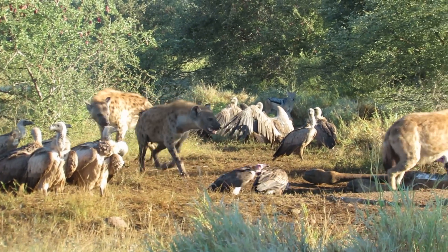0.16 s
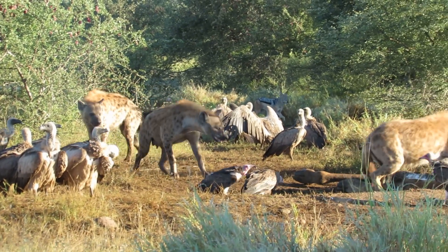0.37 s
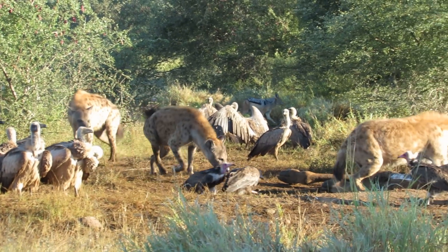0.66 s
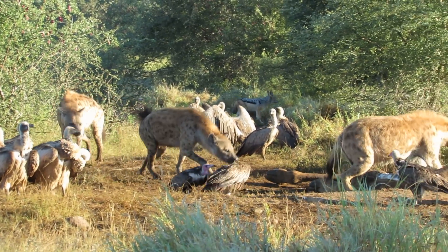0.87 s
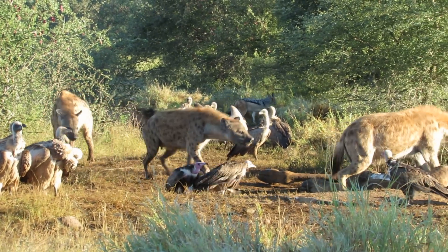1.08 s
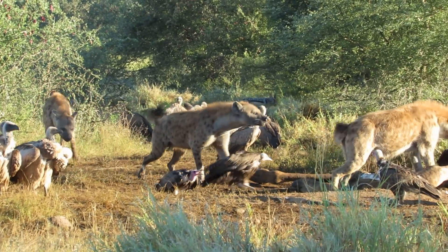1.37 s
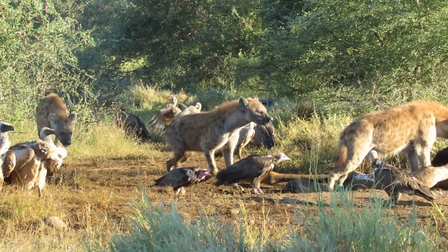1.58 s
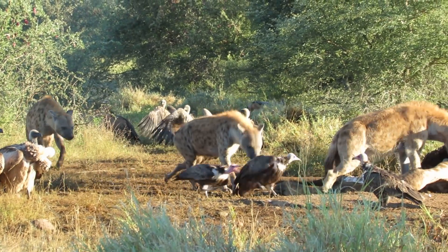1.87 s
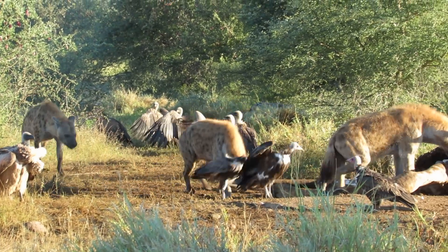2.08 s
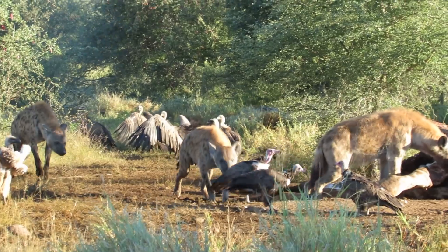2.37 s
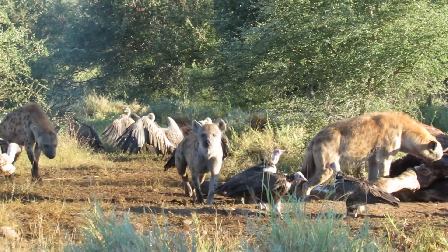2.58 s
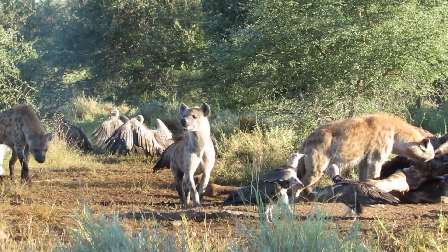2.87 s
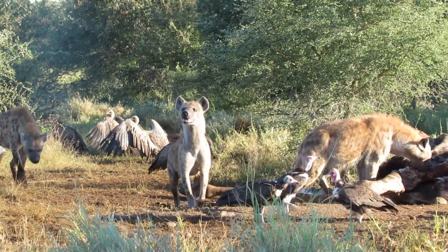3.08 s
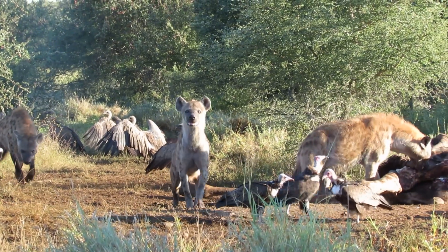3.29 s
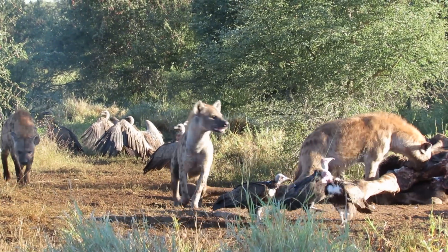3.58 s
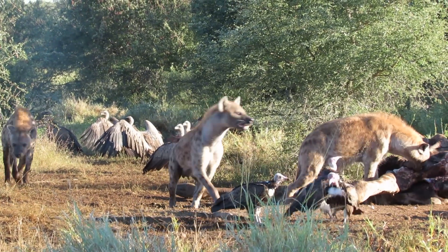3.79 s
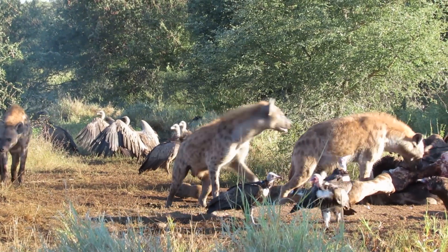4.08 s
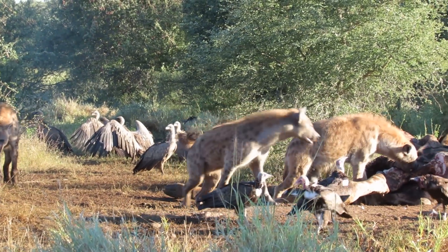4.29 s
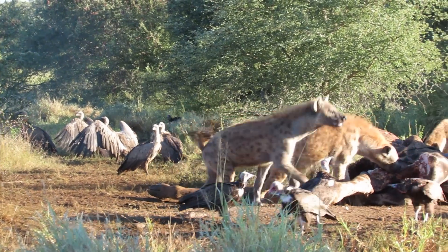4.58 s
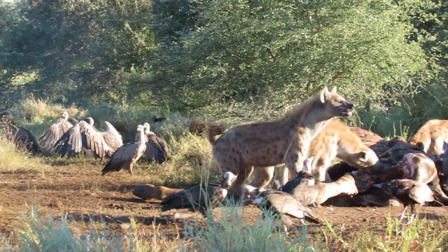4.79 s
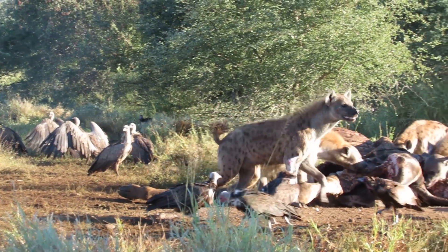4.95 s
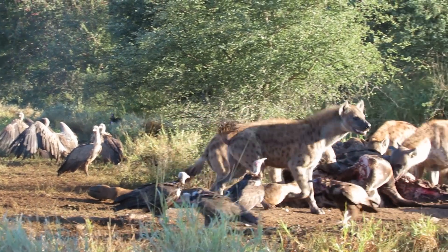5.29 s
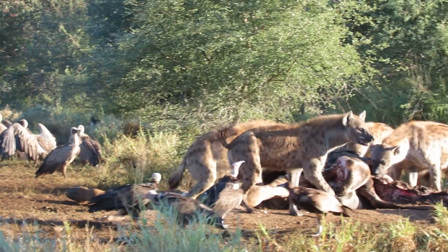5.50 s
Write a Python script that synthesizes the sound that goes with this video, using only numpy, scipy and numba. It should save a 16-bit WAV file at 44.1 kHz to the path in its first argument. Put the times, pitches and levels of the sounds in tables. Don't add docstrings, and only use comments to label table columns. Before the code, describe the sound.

Vultures hiss, squeal and cackle harshly over a carcass in open bush, with beak snaps, soft thuds, wing swishes and small birds whistling.

```python
import sys
import numpy as np
from scipy import signal
from scipy.fft import rfft, irfft
from scipy.io import wavfile
from scipy.ndimage import uniform_filter1d
from numba import njit

SR = 44100
rng = np.random.default_rng(int(sys.argv[2]) if len(sys.argv) > 2 else 0)


def linear_from_db(decibels):
    return 10 ** (np.asarray(decibels, float) / 20)


def transcribe(u):
    v = np.clip(np.atleast_2d(u).T, -1, 1)
    q = np.round(v * 32767).astype(np.int16)
    wavfile.write(sys.argv[1], SR, q)


N = 248194
T = np.arange(N) / SR
HZ = np.maximum(np.arange(N // 2 + 1) * SR / N, 1)

# f/Hz, density/dB
BUSH_MID = [(15, -46), (25, -13), (100, -4), (250, -4), (800, -5), (1500, -9), (2900, -12), (3600, -15),
            (5600, -16.5), (9000, -20), (12000, -23.5), (15600, -28)]
# f/Hz, density/dB
BUSH_SIDE = [(15, -56), (25, -32), (70, -15), (180, -14), (480, -16.5), (850, -19.5), (1600, -25),
             (2900, -29), (3500, -30), (7000, -38), (12000, -40.5), (15600, -49)]
BUSH_MID_DB, BUSH_SIDE_DB = -58.5, -54
# t/s, level/dB
TRAMPLE = [
    (0, -64.5),
    (.9, -59),
    (2.2, -60),
    (3.3, -62),
    (5.63, -67),
]
ECHO_T60_S, ECHO_DB = 0.4, -13

# t/s, length/s, level/dB
CHIPS = [
    (3.199, 0.014, -57.5),
    (3.45, 0.012, -57),
    (4.008, .01, -57.5),
    (4.037, .013, -61),
    (4.124, .03, -61),
    (4.235, 0.026, -58),
    (4.441, 0.036, -56),
    (4.675, 0.021, -56.5),
    (5.494, 0.024, -58.5),
]
CHIP_HZ = 1708
# t/s, length/s, start f/Hz, level/dB
CHIRPS = [
    (.048, 0.043, 3660, -61),
    (.518, .07, 3360, -62),
    (3.733, 0.016, 3100, -63),
    (3.864, 0.014, 3320, -63.5),
    (3.94, .02, 3330, -74),
    (4.94, .012, 2380, -66),
    (5.533, .016, 3410, -59),
]
# t/s, length/s, f/Hz, level/dB
RIGHT_WHISTLES = [(0, .036, 2720, -67), (.059, 0.054, 3210, -63), (.408, .041, 7320, -75),
                  (2.371, 0.12, 3030, -66.5), (3.136, 0.03, 2500, -59), (3.153, 0.026, 3270, -58.5),
                  (3.727, 0.012, 3340, -56), (3.755, .042, 4140, -68), (4.014, 0.033, 2496, -60),
                  (4.44, 0.04, 3880, -72), (4.872, 0.035, 2500, -63), (5.21, 0.042, 1516, -67),
                  (5.268, .014, 1500, -64)]
# t/s, length/s, f/Hz, level/dB
FRONT_WHISTLES = [
    (.318, 0.038, 3380, -62.5),
    (1.975, .14, 1900, -69),
    (3.37, 0.048, 2960, -66),
    (3.635, 0.025, 5960, -61),
    (3.803, 0.032, 2494, -61.5),
    (5.138, 0.029, 1290, -61),
]
# t/s, length/s, start f/Hz, level/dB
RISING = [
    (5.071, .03, 2740, -61),
]
# share of pitch lost, settling/s, left minus right/dB
CHIP_WAY = (0.122, 0.015, 2.5)
CHIRP_WAY = (.38, 0.032, -13)
RIGHT_WAY = (0.0242, 0.052, -11.5)
FRONT_WAY = (.025, 0.048, 2)
RISING_WAY = (-0.21, 0.16, -3)
# t/s, length/s, from f/Hz, to f/Hz, level/dB
WHINES = [(.085, .09, 2200, 1850, -69), (.062, 0.06, 3430, 3220, -66), (.085, .03, 3200, 3150, -64),
          (.17, .042, 3370, 2880, -65), (.31, 0.045, 3100, 2500, -67), (.39, 0.088, 4320, 4080, -68),
          (.47, .055, 3920, 3500, -63.5), (2.7, .05, 2720, 2680, -66), (2.52, .1, 3060, 3220, -73),
          (2.625, 0.04, 3360, 3130, -63), (2.2, .03, 3100, 3320, -66), (2.655, 0.033, 2470, 2200, -70),
          (2.685, 0.053, 2430, 2680, -66.5), (2.48, 0.079, 2370, 2620, -72), (3.742, .028, 3180, 3380, -61),
          (5.232, .03, 3600, 3580, -63), (5.53, .022, 3350, 3300, -61), (2.4, .08, 3010, 2980, -66),
          (3.875, 0.022, 3300, 3300, -69), (5.545, .03, 3300, 3300, -65), (2.1, .008, 2100, 2050, -59),
          (2.68, .025, 3250, 3400, -71), (2.97, 0.12, 4730, 3200, -70), (3.5, 0.074, 2550, 2950, -69),
          (4.738, .022, 3550, 3400, -56), (4.265, .012, 1750, 1860, -64), (3.77, .016, 3480, 3680, -66)]
WHINE_PAN_DB = -5

# t/s, level/dB, beak opening/0-1
HISS = [(0, -62.5, 0.25), (.38, -60.5, 0.4), (.55, -57, 0.41), (.7, -55.5, 0.9), (1.0, -55, 0.87),
        (1.42, -53.5, 0.93), (1.6, -56.5, 1), (1.9, -59.5, 0.88), (2.15, -58.5, 0.22), (2.45, -58, .02),
        (2.7, -66.5, 0.26), (3.0, -58.5, 0.44), (3.3, -66.5, 0.05), (3.85, -63, .3), (4.5, -70.5, 0.04),
        (4.62, -55.5, 0.48), (5.12, -55.5, .7), (5.22, -58, 1)]
# f/Hz, width/Hz, level/dB
HISS_TRACT = [
    [(2300, 510, -3), (2785, 420, -3.5), (3180, 540, -3), (1553, 170, -7)],
    [(4130, 370, 1.5), (4630, 440, 3.5), (7700, 1800, -14.5)],
    [(5300, 610, 0), (6030, 600, 0), (6500, 440, 0.5), (10700, 4200, -13)],
]
BEAK_DB_PER_OPENING, BEAK_FULL_AT, BEAK_FULL_DB, SHARP_DB_PER_OPENING = 45, 0.5, 0.5, 26

# t/s, length/s, level/dB, centre f/Hz, width/Hz
SWISH = [(0.376, 0.048, -60, 4800, 8000), (0.59, 0.14, -56, 5600, 9800), (1.436, 0.078, -45, 6500, 14000),
         (1.45, 0.063, -47, 8000, 3500), (1.465, 0.04, -51, 4000, 3300), (1.44, .075, -56, 12100, 5000),
         (1.49, .05, -52, 11000, 2700), (1.506, 0.061, -45.5, 5570, 2400), (1.61, 0.02, -50.5, 4600, 12000),
         (1.8, 0.052, -55, 6000, 6000), (4.52, .14, -62.5, 2830, 740), (5.18, 0.047, -60, 5900, 1200),
         (5.27, 0.58, -58, 4600, 1900), (2.032, 0.22, -60.5, 6500, 7000), (3.152, .028, -52, 6500, 12000),
         (3.744, 0.016, -52.5, 9600, 9700), (4.022, 0.022, -60, 8300, 8000),
         (5.438, 0.021, -54, 2900, 1100), (6.1, 0.051, -55.5, 3100, 1100), (3.012, 0.042, -62, 9000, 5000),
         (2.896, .04, -54, 1350, 350), (2.901, .014, -48, 7900, 1500), (2.845, 0.057, -58, 2900, 2900),
         (4.17, .09, -61.5, 3000, 1300), (2.95, 0.036, -55, 2100, 2300), (1.297, 0.14, -57, 6200, 4200),
         (1.63, 0.082, -63, 9000, 5000)]
# t/s, peak level/dB, ring f/Hz
THUDS = [(.4, -50.5, 410), (.544, -56, 450), (0.605, -50.5, 342), (.614, -51, 650), (.653, -51.5, 420),
         (.653, -47, 950), (.696, -52, 332), (0.667, -38, 690), (.7, -53, 524), (1.024, -46.5, 517),
         (1.031, -50, 446), (1.442, -49.5, 627), (1.93, -54, 716), (2.049, -54, 480), (2.24, -53, 705),
         (3.155, -56, 330), (5.1, -56, 520), (5.2, -56.5, 560), (5.3, -55, 500), (3.198, -52.5, 420),
         (3.203, -54.5, 380), (3.216, -48, 604), (3.223, -51, 520), (5.065, -55, 503)]
# t/s, peak level/dB, ring f/Hz, hollow note level/dB
SNAPS = [(0.4988, -35.5, 4680, -2.5), (0.5429, -32.5, 4500, -3), (.572, -45, 7700, -15),
         (0.586, -32, 4930, -4), (0.591, -34, 5160, -8), (0.614, -36.5, 8200, -2.5),
         (0.6532, -42, 8000, 6.5), (1.618, -43, 5000, 6), (2.286, -46, 4000, -8), (2.717, -46, 7075, -18),
         (3.006, -44, 10000, -15), (3.22, -46, 5000, 0), (3.625, -40, 5840, -12), (3.75, -42, 6100, 0),
         (4.031, -50, 6500, -14), (4.391, -42.5, 5600, -17.5), (4.447, -47, 6100, -15),
         (4.47, -53, 5600, -15), (4.488, -45, 5800, -17), (4.659, -44, 8000, -3)]

# f/Hz, left minus right level/dB, left lead/rad
FLOCK_PORTS = [(700, 1, -0.24), (1500, -1, -1.05), (2230, -6.5, -0.36), (2880, -10, -1.16), (4450, -1, .8),
               (6200, -3.5, -1.06), (8850, -3, 1.6), (12400, 8, -2.1)]
# f/Hz, left minus right level/dB, left lead/rad
SQUEALER_PORTS = [(1600, -6, 4), (2250, -9, 1.8), (2850, -9, .2), (4200, -5, -1.8), (6000, 0, -1.5)]
# f/Hz, level/dB
AIR = [(6000, 0.5), (10000, -2.5), (13000, -9), (16000, -4)]
# f/Hz, level/dB
GROUND_DIP = [(1600, -0.5), (1750, -7.5), (1930, -5), (2050, -0.5)]

# t/s, level/dB
JOLTS = [(.7303, 5), (.7385, -3), (.7459, 5), (.7535, -3), (.7657, 4), (0.8197, 2.1), (0.825, -9),
         (.8875, -4), (.8911, 5), (.8985, 0), (.9571, 3.5), (.962, -5), (.9756, 3.5), (1.0398, 4),
         (1.0468, -5), (1.0498, 3), (1.0525, -5), (1.0563, 1.1), (1.0595, -4), (1.0625, 4), (1.1483, 2.5),
         (1.1536, -5), (1.1663, 4), (1.2386, 2.1), (1.247, 4), (1.261, 2), (1.272, 2.5), (1.2811, -5),
         (2.3413, 1), (2.8145, -3), (2.8194, 4), (2.8285, -6), (2.9094, -6), (2.9215, -4), (2.912, 2.1),
         (2.926, 4), (4.742, 2.5), (4.753, 3)]
JOLT_S = 0.001
# f/Hz, level/dB
RASP_THROAT = [(700, -27), (1800, -13), (2200, -2.5), (3200, -3.5), (3600, -10), (4300, -10), (5200, -27),
               (6800, -28), (8500, -22.5), (10500, -29), (14000, -40)]
RASP_RISE_DB, RASP_FALL_DB, RASP_SAG = -5, -14, 0.026
OVERTONE_DB = -29
CHEST_WIDTH_HZ, CHEST_RING_DB = 73, 2
CHEST_LINGER_DB = 11
SECOND, SIXTH = 2, 6

# t/s, f/Hz, level/dB
SQUEAL_CLIMB = [
    [(.218, 530, -55), (.228, 566, -46.5), (.25, 589, -44.5), (.261, 610, -41.5), (.268, 605, -47)],
    [(1.785, 519, -57), (1.803, 528, -50), (1.818, 590, -46.5), (1.835, 590, -43.5), (1.846, 553, -50)],
    [(2.295, 491, -60), (2.31, 511, -53), (2.325, 558, -47.5), (2.336, 587, -44), (2.342, 596, -48)],
    [(2.762, 570, -58), (2.785, 589, -48), (2.797, 613, -44), (2.804, 612, -48)],
    [(3.6, 505, -65), (3.618, 521, -48), (3.632, 524, -49), (3.648, 570, -44), (3.664, 568, -42.5),
     (3.678, 508, -51), (3.685, 480, -58)],
    [(4.105, 501, -56), (4.118, 529, -51), (4.138, 548, -48), (4.15, 584, -45.5), (4.162, 572, -47),
     (4.172, 534, -52)],
    [(4.7, 522, -58), (4.72, 559, -51), (4.732, 589, -43), (4.739, 660, -44), (4.744, 670, -50)],
    [(5.21, 502, -60), (5.235, 498, -54.5), (5.246, 510, -50), (5.256, 561, -49), (5.27, 520, -49),
     (5.279, 510, -57)],
]
# t/s, rise/s, level/dB
SQUEAL = [
    (.256, 0.0095, -45.5),
    (1.836, .006, -51),
    (2.335, 0.0085, -42),
    (2.793, .01, -38.5),
    (3.662, .01, -62),
    (4.153, 0.011, -48),
    (4.735, .008, -39.5),
    (5.258, .01, -51),
]
# chest/dB, sixth partial/dB, beak/dB, windpipe f/Hz, roughness/0-1
SQUEAL_TONE = [(-6, 0, 12, 2560, 0.3), (-1, -1, 9, 2740, 0.28), (0, 0, 10, 2560, 0.4),
               (-3, -1, 10, 2630, 0.55), (-1, -12, 7, 2700, 0.18), (3, -1, 13, 2720, 0.43),
               (-3, 1, 12, 2460, 0.5), (3, -9, 16.5, 2840, 0.55)]
# f/Hz, width/Hz, spray level/dB, fall/s
SQUEAL_RING = [(2620, 400, -1, 0.027), (2640, 400, -2, .025), (2620, 290, -3, 0.037),
               (2720, 310, -5.5, 0.039), (2640, 400, -2, .03), (2720, 400, -2, 0.021),
               (2690, 240, -3.5, 0.027), (2700, 400, -1, .022)]
# f/Hz, level/dB
SQUEAL_THROAT = [(600, -44), (1200, -1.5), (1650, 10), (2300, 5), (2900, 1), (3350, 1), (3850, -4.5),
                 (4500, -30), (6000, -55), (12000, -59)]
# beak/dB, top/dB
SQUEAL_SPRAY = (-4, -14)
SQUEAL_PAN_DB = 1.5

# t/s, rise/s, fall/s, f/Hz, level/dB
CACKLE = [
    (.72, 0.015, 0.043, 810, -34.5),
    (.808, 0.0044, 0.017, 809, -33),
    (.871, 0.0041, 0.011, 802, -29.5),
    (.952, 0.0042, .01, 750, -32),
    (1.032, 0.0039, 0.011, 738, -32.5),
    (1.133, 0.012, 0.01, 690, -34.5),
    (1.233, 0.0074, 0.012, 674, -37.5),
    (2.892, 0.012, 0.005, 688, -29.5),
]
# t/s, rise/s, fall/s, windpipe f/Hz, level/dB
CACKLE_RASP = [
    (.742, .012, 0.033, 2240, -38),
    (.818, 0.0025, 0.021, 2300, -35.5),
    (.884, 0.013, 0.015, 2280, -31.5),
    (.962, 0.016, .016, 2380, -33),
    (1.043, 0.011, 0.02, 2270, -31),
    (1.146, .003, 0.025, 2590, -37),
    (1.246, 0.026, 0.022, 2620, -38),
    (2.903, .012, .022, 2130, -32),
]
# chest/dB, beak/dB, top/dB, roughness/0-1, beak in the rasp/dB
CACKLE_TONE = [(-14, -5, -7.5, 0.18, -4), (0.5, 1.5, -4.5, 0.34, -6), (-0.5, -3, -5, 0.4, -31),
               (7, -1, 5, 0.25, -20), (6.5, 3.5, 8, 0.26, -10), (2.5, -2.5, 6, .2, 2),
               (8.5, 6.5, 9, 0.64, -4), (-11, 10, 2, 0.2, 14)]
# second partial/dB, clean fall/dB, rasp spray/dB, ring width/Hz
CACKLE_THROAT_SET = [(-2, -9, -6.5, 370), (-4.5, -7, -4, 580), (-7, -9, -8, 610), (-1, -15, -6.5, 910),
                     (1.5, -10, -6, 360), (3.5, -10, -8, 590), (-2.5, -5, -1.5, 570), (7.5, -4, -9, 250)]
# hold of the clean start/s, share by which the rasp ring slides down
CACKLE_RUN = [(.005, .04), (0.0063, .04), (0.0035, .03), (.001, .03), (0.0038, .03), (.003, 0.065),
              (.003, .03), (.001, .25)]
# f/Hz, level/dB
CACKLE_THROAT = [(500, -5), (750, -9), (1400, -9.5), (2000, 1), (2900, -1.5), (3500, -19.5), (4200, -5),
                 (5000, -16), (6500, -22), (10500, -23), (14000, -37)]
SCOOP_HZ, FIRST_SCOOP_HZ = 7, 126
REST_HZ, SAG_PER_S = 663, 18.7
CACKLE_RISE_DB, CACKLE_PAN_DB = -8.5, -1.5


def on_log(points, hz):
    f, v = np.transpose(points)
    return np.interp(np.log(hz), np.log(np.maximum(f, 1)), v)


def colour(x, points):
    return irfft(rfft(x) * linear_from_db(on_log(points, HZ)), N)


def unit(x):
    return x / np.sqrt(np.mean(x ** 2))


@njit
def svf(x, hz, width):
    y, b, l = np.empty(len(x)), 0., 0.
    for i in range(len(x)):
        g, k = np.tan(np.pi * hz[i] / SR), width / hz[i]
        v = (b + g * (x[i] - l)) / (1 + g * (g + k))
        b, l, y[i] = 2 * v - b, l + 2 * g * v, k * v
    return y


def band(x, hz, width):
    return svf(x, hz + np.zeros(len(x)), 1. * width)


def walk(rate):
    k = int(SR / rate)
    steps = np.repeat(rng.standard_normal(N // k + 1), k)
    return 1.58 * uniform_filter1d(uniform_filter1d(steps, k), k)[:N]


def swell(t, length, rise):
    u = np.clip(t / length, 0, 1)
    return np.sin(np.pi * u ** (np.log(.5) / np.log(rise)))


def span(s, length):
    return slice(int(s * SR), int((s + length) * SR))


def pan(x, db):
    return x * linear_from_db(np.array([[db], [-db]]) / 2)


def ports(x, table):
    hz, db, rad = np.transpose(table)
    skew = linear_from_db(np.interp(HZ, hz, db) / 2) * np.exp(.5j * np.interp(HZ, hz, rad))
    return irfft(rfft(x) * np.array([skew, 1 / skew]), N)


def bush():
    mid, side = (unit(colour(rng.standard_normal(N), c)) for c in (BUSH_MID, BUSH_SIDE))
    drift = linear_from_db(.4 * walk(1.5) + .4 * walk(9))
    feet_level = linear_from_db(np.interp(T, *np.transpose(TRAMPLE)) - 4.5 + 2 * walk(40))
    feet = feet_level * unit(band(rng.standard_normal(N), 410, 690))
    wash = linear_from_db(BUSH_MID_DB) * mid + linear_from_db(BUSH_SIDE_DB) * side * np.array([[1], [-1]])
    return feet + drift * wash


def scatter(close, birds):
    t = T[:SR // 2]
    trees = rng.standard_normal((2, len(t))) * linear_from_db(-60 * t / ECHO_T60_S) * (t > .006)
    trees = signal.lfilter([1], [1, -.4], trees / np.sqrt(3 * np.sum(trees ** 2)))
    return linear_from_db(ECHO_DB) * signal.fftconvolve(close[1:] + 1.6 * birds[1:], trees, axes=1)[:, :N]


def whistle(t, length, hz, db, peak):
    return linear_from_db(db + 5.5) * swell(t, length, peak) ** .5 * np.sin(2 * np.pi * np.cumsum(hz) / SR)


def small_birds():
    out, warble, leaves = np.zeros((2, N)), walk(250), linear_from_db(1.6 * walk(300))
    chips = [(s, length, CHIP_HZ, db) for s, length, db in CHIPS]
    kinds = [(chips, CHIP_WAY), (CHIRPS, CHIRP_WAY), (RIGHT_WHISTLES, RIGHT_WAY),
             (FRONT_WHISTLES, FRONT_WAY), (RISING, RISING_WAY)]
    for notes, (share, settle_s, side_db) in kinds:
        for s, length, from_hz, db in notes:
            at = span(s, length)
            glide = 1 - share * (1 - np.exp((s - T[at]) / settle_s))
            hz = from_hz * glide * (1 + 0.0095 * warble[at])
            out[:, at] += pan(leaves[at] * whistle(T[at] - s, length, hz, db, 0.25), side_db)
    for s, length, from_hz, to_hz, db in WHINES:
        at = span(s, length)
        hz = np.interp(T[at], [s, s + length], [from_hz, to_hz]) * (1 + 0.0063 * warble[at])
        out[:, at] += pan(leaves[at] * whistle(T[at] - s, length, hz, db, .4), WHINE_PAN_DB)
    return out


def hissing():
    s, level_db, gape = np.transpose(HISS)
    beak_db = BEAK_FULL_DB + BEAK_DB_PER_OPENING * np.minimum(gape - BEAK_FULL_AT, 0)
    levels = level_db, level_db + beak_db, level_db + SHARP_DB_PER_OPENING * (gape - 1)
    out, flutter = 0, walk(30)
    for db, tract in zip(levels, HISS_TRACT):
        pair = []
        for _ in range(2):
            breath = sum(linear_from_db(g) * band(band(rng.standard_normal(N), f, w), f, 2 * w) for f, w, g in tract)
            pair.append(unit(breath))
        out = out + linear_from_db(np.interp(T, s, db) - 3.0 + flutter + walk(45)) * np.array(pair)
    return out


def wings():
    out = np.zeros(N)
    air = rng.standard_normal(N) * linear_from_db(2.0 * walk(400))
    for s, length, db, hz, width in SWISH:
        at = span(s, length)
        rush = unit(band(band(air[at], hz, width), hz, 2 * width))
        out[at] += linear_from_db(db) * swell(T[at] - s, length, 0.44) ** 0.5 * rush
    return out


def snaps():
    out, t = np.zeros(N), T[:1500]
    grit = rng.standard_normal((len(SNAPS), len(t)))
    for (s, db, hz, hollow_db), noise in zip(SNAPS, grit):
        tick = band(((t == 0) + 0.19 * noise) * np.exp(-t / 0.00068), hz, 0.24 * hz)
        hollow = linear_from_db(hollow_db) * np.exp(-t / 0.001) * np.sin(2 * np.pi * 2700 * t)
        out[int(s * SR):][:len(t)] += linear_from_db(db) * (tick / np.abs(tick).max() + hollow)
    return out


def thuds():
    out, t = np.zeros(N), T[:1500]
    for s, db, hz in THUDS:
        ring = np.exp(-t * hz / 1.84) * np.sin(2 * np.pi * hz * t)
        ring += .5 * np.exp(-t * hz / 1.7) * np.sin(2 * np.pi * 1.72 * hz * t)
        ring += 0.26 * np.exp(-t * hz / 1.5) * np.sin(2 * np.pi * 2.3 * hz * t)
        out[int(s * SR):][:len(t)] += linear_from_db(db + 7) * band(ring, 1.3 * hz, 3.2 * hz)
    return out


def jolts():
    s, db = np.transpose(JOLTS)
    kicks = np.bincount((s * SR).astype(int), db, N)
    hump = np.exp(-.5 * (np.arange(-400, 401) / SR / JOLT_S) ** 2)
    return linear_from_db(signal.fftconvolve(kicks, hump, "same"))


def phrase(call, fade=0.0034):
    s, hz, db = np.transpose(call)
    at = slice(int(s[0] * SR), int(s[-1] * SR))
    edge = np.clip(np.minimum(T[at] - s[0], s[-1] - T[at]) / fade, 0, 1)
    return at, np.interp(T[at], s, hz), linear_from_db(np.interp(T[at], s, db)) * edge


def opening(chest_db, beak_db, top_db, hz):
    return on_log([(900, chest_db), (1900, 0), (3300, 0), (3900, beak_db), (4900, beak_db), (6200, top_db)], hz)


def rasp(s, rise, fall, hz, db, slide):
    return [(s, hz * (1 + slide), db + RASP_RISE_DB), (s + rise, hz, db),
            (s + rise + fall, hz * (1 - RASP_SAG), db + RASP_FALL_DB)]


def rasps(calls):
    chance = rng.standard_normal((4000, 2))
    at = np.cumsum(SR / 480 * np.exp(.3 * chance[:, 0])).astype(int)
    slaps = np.bincount(at[at < N], linear_from_db(2 * chance[at < N, 1]), N) + 0.08 * rng.standard_normal(N)
    out = np.zeros((2, N))
    for n, (*_, call, (width_hz, spray_db, beak_db, top_db)) in enumerate(calls):
        at, hz, gain = phrase(call)
        ring = unit(band(band(slaps[at], hz, width_hz), hz, 1.5 * width_hz))
        ring = unit(band(np.tanh(2.5 * ring), hz, 900))
        octave = linear_from_db(OVERTONE_DB + beak_db) * unit(band(ring ** 2, 2 * hz, 550))
        bins = np.maximum(np.fft.rfftfreq(len(hz), 1 / SR), 1)
        throat = linear_from_db(on_log(RASP_THROAT, bins) + opening(0, 0.45 * beak_db, top_db, bins))
        spray = irfft(rfft(slaps[at]) * throat, len(hz))
        bird = int(n >= len(CACKLE))
        out[bird, at] += gain * (linear_from_db(-6.0) * ring + octave + linear_from_db(spray_db) * unit(spray))
    return out


def syrinx(call, throat, tone):
    *regions, odd_one, odd_db, pipe_hz, rough, side_db = tone
    at, hz, gain = phrase(call)
    k = np.arange(1, 22)[:, None]
    windpipe_db = 11 / (1 + ((k * hz - pipe_hz) / 350) ** 2)
    windpipe_db += 10 / (1 + ((k * hz - min(3.9 * pipe_hz, 9250)) / 600) ** 2)
    odd_partial_db = odd_db * ((k == odd_one) - .5 * (k == 2 * odd_one))
    linger_db = CHEST_LINGER_DB * (k == 1) * np.linspace(-.5, .5, len(hz))
    throat_db = on_log(throat, k * hz) + opening(*regions, k * hz)
    weight = linear_from_db(throat_db + windpipe_db + odd_partial_db + linger_db)
    lead = weight * (k * hz > 1300) * (k * hz < 4000)
    shake = rng.standard_normal((2, 21, 4000))
    shake = 6 * uniform_filter1d(uniform_filter1d(shake, 30), 30)
    shake = shake[0] + 1j * shake[1]
    smear = np.clip(rough * (k / 4) ** 0.79, 0, .95)
    phase = k * 2 * np.pi * np.cumsum(hz) / SR + k * k
    cycle = (np.sqrt(1 - smear ** 2) + smear * shake[:, :len(hz)]) * np.exp(1j * phase)
    partials = weight * cycle.imag / np.sqrt(np.sum(lead ** 2, axis=0) / 2) * gain
    out = np.zeros(N)
    out[at] = np.sum(partials[1:], axis=0)
    after = (0, 900)
    chest = band(np.pad(partials[0], after), np.pad(hz, after, "edge"), CHEST_WIDTH_HZ)
    out[at.start:at.stop + after[1]] += linear_from_db(CHEST_RING_DB) * chest
    return pan(out, side_db)


def squeal(count):
    s, up, rasp_db = SQUEAL[count]
    chest_db, sixth_db, beak_db, pipe_hz, rough = SQUEAL_TONE[count]
    ring_hz, width_hz, spray_db, down = SQUEAL_RING[count]
    tone = chest_db, beak_db, 0, SIXTH, sixth_db, pipe_hz, rough, SQUEAL_PAN_DB
    broken = rasp(s, up, down, ring_hz, rasp_db, RASP_SAG)
    return SQUEAL_CLIMB[count], tone, broken, (width_hz, spray_db, *SQUEAL_SPRAY)


def cackle(count):
    s, rise, fall, hz, db = CACKLE[count]
    chest_db, beak_db, top_db, rough, rasp_beak_db = CACKLE_TONE[count]
    *timing, pipe_hz, rasp_db = CACKLE_RASP[count]
    second_db, fall_db, spray_db, width_hz = CACKLE_THROAT_SET[count]
    hold, slide = CACKLE_RUN[count]
    scoop_hz = SCOOP_HZ if count else FIRST_SCOOP_HZ
    end_hz = hz - SAG_PER_S * (hz - REST_HZ) * fall
    call = [(s, hz - scoop_hz, db + CACKLE_RISE_DB), (s + rise, hz, db),
            (s + rise + min(hold, .8 * fall), hz, db - 2.5), (s + rise + fall, end_hz, db + fall_db)]
    tone = chest_db, beak_db, top_db, SECOND, second_db, .97 * pipe_hz, rough, CACKLE_PAN_DB
    spray = width_hz, spray_db, rasp_beak_db, 0.62 * max(rasp_beak_db, 0)
    return call, tone, rasp(*timing, pipe_hz, rasp_db, slide), spray


def scene():
    cackler = [cackle(n) for n in range(len(CACKLE))]
    squealer = [squeal(n) for n in range(len(SQUEAL))]
    cackle_rasp, squeal_rasp = rasps(cackler + squealer)
    near_hiss, wide_hiss = hissing()
    catch = jolts()
    cackles = sum(syrinx(c, CACKLE_THROAT, tone) for c, tone, *_ in cackler)
    squeals = sum(syrinx(c, SQUEAL_THROAT, tone) for c, tone, *_ in squealer)
    cackling = colour((cackles + cackle_rasp) * catch, GROUND_DIP)
    scuffle = colour(snaps() + thuds() + wings(), AIR)
    flock = ports(cackling + scuffle, FLOCK_PORTS)
    birds = small_birds()
    close = flock + ports((squeals + squeal_rasp) * catch, SQUEALER_PORTS) + birds
    hiss = ports(near_hiss, FLOCK_PORTS) + .5 * wide_hiss * np.array([[1], [-1]])
    return close + scatter(close, birds) + hiss + bush()


def roll_off(x):
    return signal.sosfilt(signal.butter(12, 15760, fs=SR, output="sos"), x)


def record(dry):
    return roll_off(dry)


dry = scene()
out = record(dry)
transcribe(out)
```